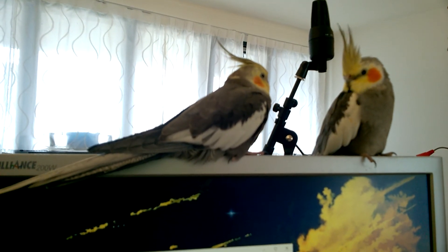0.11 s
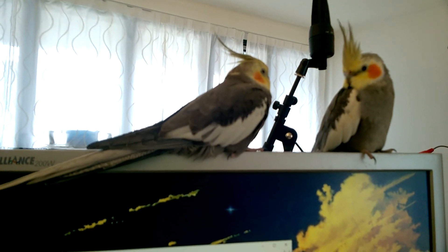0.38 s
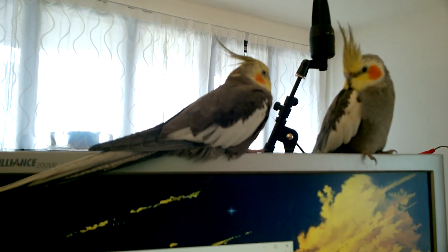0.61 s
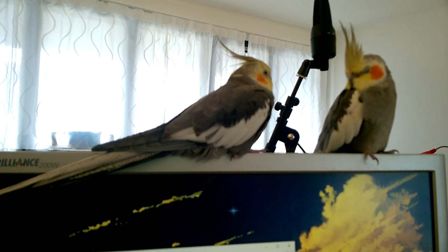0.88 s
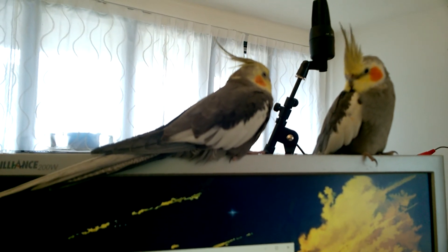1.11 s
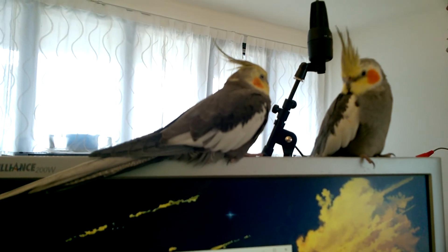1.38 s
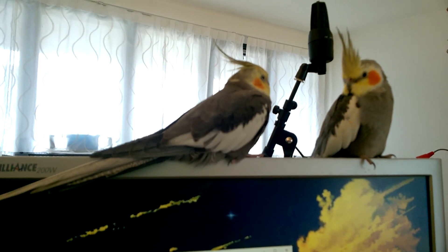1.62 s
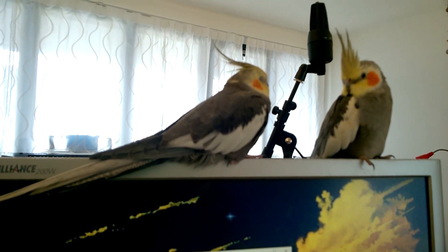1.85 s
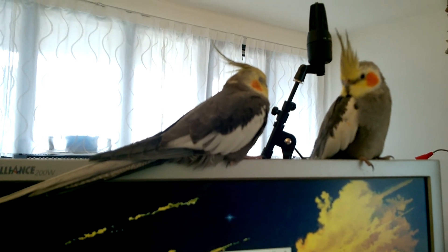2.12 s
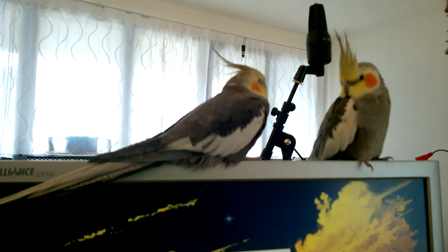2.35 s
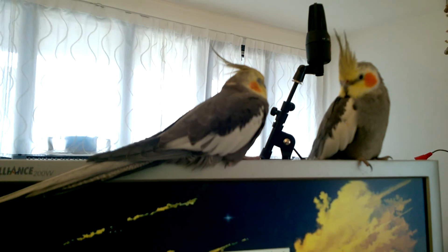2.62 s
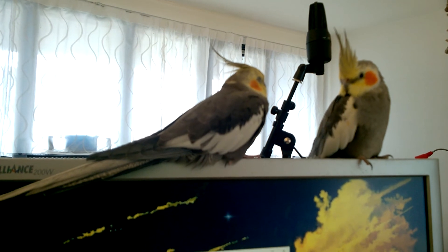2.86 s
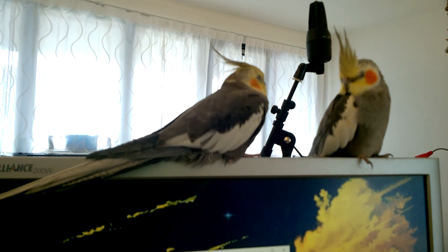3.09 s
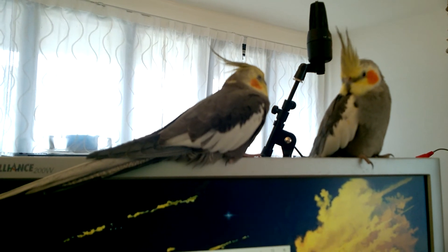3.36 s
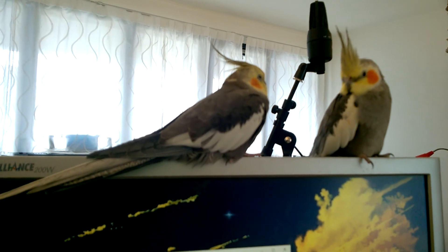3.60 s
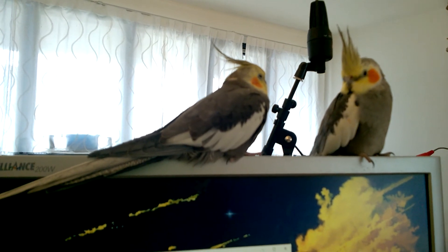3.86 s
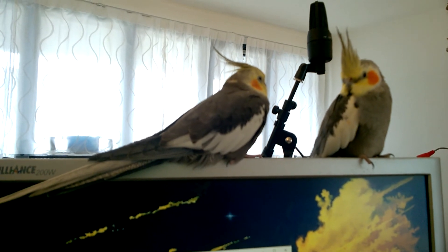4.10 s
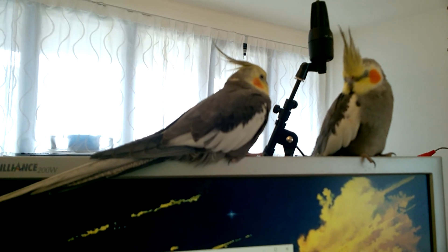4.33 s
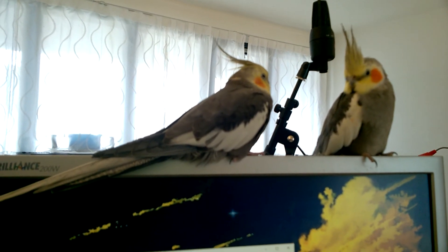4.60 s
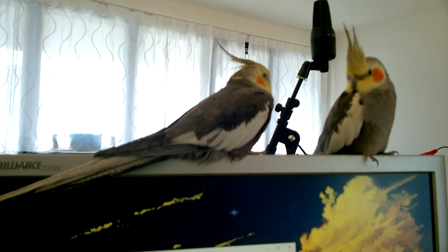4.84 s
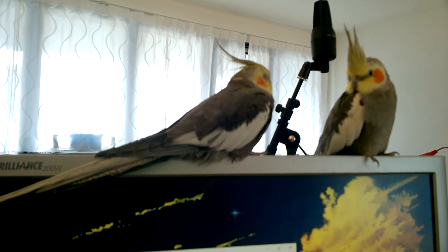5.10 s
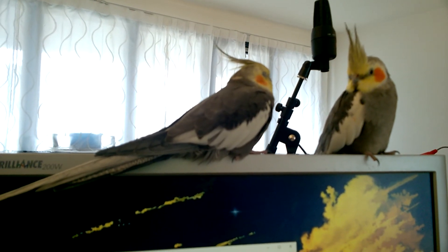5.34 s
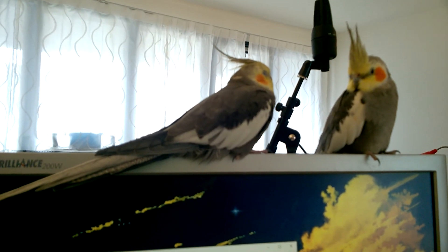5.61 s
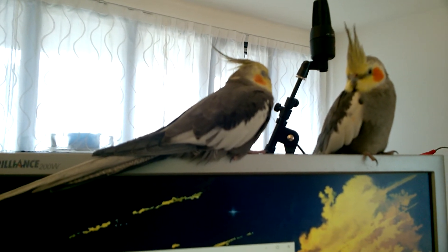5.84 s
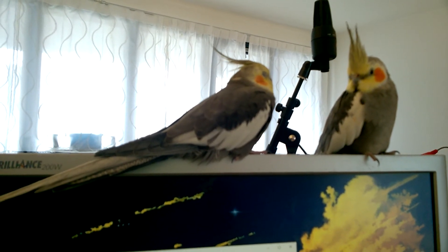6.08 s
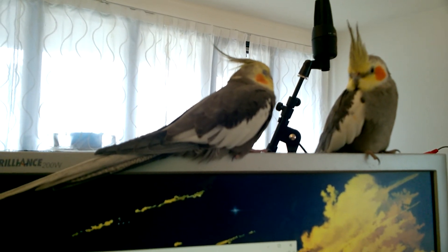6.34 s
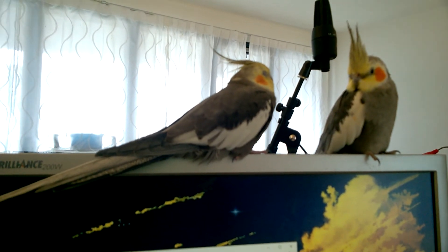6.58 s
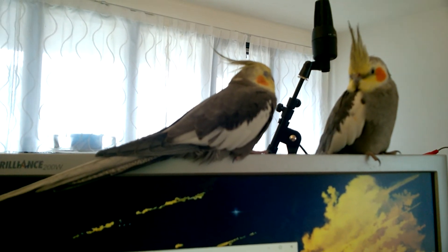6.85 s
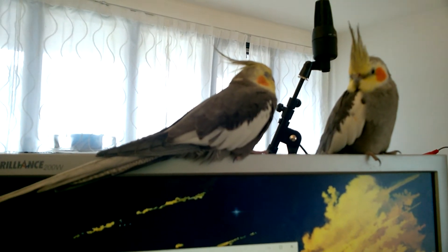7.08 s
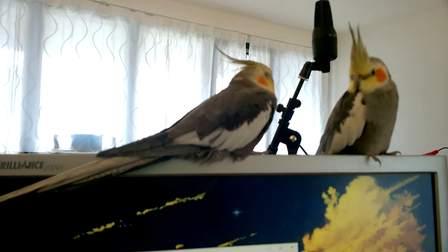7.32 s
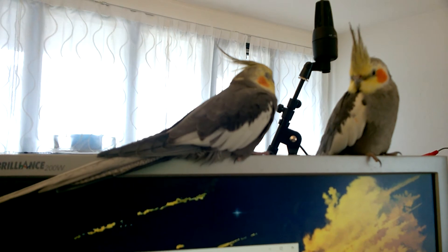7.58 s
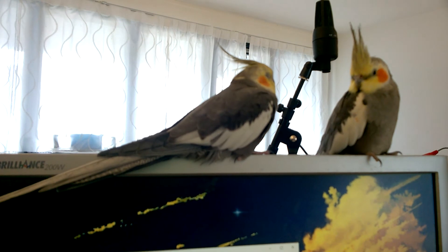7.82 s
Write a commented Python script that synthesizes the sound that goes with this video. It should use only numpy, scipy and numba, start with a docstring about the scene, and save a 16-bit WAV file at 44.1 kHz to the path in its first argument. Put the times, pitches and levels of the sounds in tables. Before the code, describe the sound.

A cockatiel gives five short raspy barks, a long nasal note breaking into a creak, one sharp whistle, then quickening bright chirps in a quiet room.

```python
"""Cockatiel in a quiet room

A cockatiel calls near a small microphone: five raspy barks, a long nasal note that breaks into a rasp and
a creak, one sharp whistle that ends in a short rasp, then a quickening run of ever brighter chirps.
Its voice membranes slap unevenly (a rasp) or steadily (a stack of pitched lines), and the windpipe and beak
colour the sound. Shaped noise makes the room's echoes, the hiss, a low rumble and a faint hum."""
import sys
import numpy as np
from scipy import signal
from scipy.fft import rfft, irfft
from scipy.io import wavfile
from scipy.ndimage import uniform_filter1d
from numba import njit

SR = 44100
rng = np.random.default_rng(int(sys.argv[2]) if len(sys.argv) > 2 else 0)


def attenuation_scalar(level_db):
    """Turn a level in dB into a linear amplitude multiplier (20 dB per decade)."""
    decades = np.asarray(level_db, float) / 20
    return 10 ** decades


def persist_wave(psi):
    """Save psi, clipped to +-1, as 16-bit WAV."""
    counts = np.round(np.clip(psi, -1, 1) * 32767).astype(np.int16)
    wavfile.write(sys.argv[1], SR, np.atleast_2d(counts).T)


N = 350706  # samples
T = np.arange(N) / SR  # seconds

# Steady notes, a short one and a long one, each a list of points along its course.
# Each row: time in seconds, pitch in Hz, level in dB, odd lines in dB next to the even ones,
# level of the half-pitch lines in dB, brightness in dB per octave.
STEADY_NOTES = [
    [(1.368, 628, -47, -17, -71, 1), (1.384, 687.5, -47, 7, -80, 3), (1.402, 705.7, -39.5, 0, -47, 2),
     (1.436, 728, -41, 0, -72, 0)],
    [(2.176, 646, -47, -20, -87, 3), (2.194, 688, -41.5, -1.5, -65, 1), (2.24, 722.3, -37, 0, -82, 0),
     (2.28, 748, -40, 6, -72, -3), (2.31, 732, -39.5, 0, -74, -1), (2.342, 728, -36, 2.5, -71, -3),
     (2.36, 740, -39, -1, -61, -2), (2.396, 742, -41, 5, -58, 2), (2.416, 750.3, -37, 1.5, -76, 0),
     (2.49, 732.8, -38, -5.5, -80, 2), (2.52, 727.5, -33.5, -1, -90, -.7), (2.564, 737, -37, 2, -77, .7),
     (2.582, 742, -53, 13, -61, 0)],
]
CREAK_START_S = 2.75
# throat settings shared by the barks, the break and the creak
BARK_ROUGH, BARK_TOP_DB = .18, -9
BARK_PIPE = (1478, 60, -2)  # windpipe resonance: Hz, width in Hz, ring in dB
# the creak's beak drive, and the treble drive of creak and catches, in dB next to the windpipe's
BURST_BEAK_DB, BURST_TREBLE_DB = -15, -40


@njit
def svf(x, hz, width):
    """State-variable band-pass, gain 1 at a centre that may move."""
    y, b, l = np.empty(len(x)), 0., 0.
    for i in range(len(x)):
        g, k = np.tan(np.pi * hz[i] / SR), width[i] / hz[i]
        v = (b + g * (x[i] - l)) / (1 + g * (g + k))
        b, l, y[i] = 2 * v - b, l + 2 * g * v, k * v
    return y


def band(x, hz, width):
    """A steep resonance (twice through), scaled to about equal power whatever its width."""
    hz, width = hz + np.zeros(N), width + np.zeros(N)
    # the tiny offset keeps the filter from slowing down in silence
    once = svf(x + 1e-18, hz, width)
    return svf(once, hz, width) * np.sqrt(SR / width)


def ring(x, hz, width, db, body):
    """A resonance that stands on a broad passband."""
    peak = svf(x * attenuation_scalar(db) + 1e-18, hz, width + np.zeros(N))
    return band(x + peak * np.sqrt(body[1] / width), *body)


def unit(x):
    """Scale to rms 1."""
    return x / np.sqrt(np.mean(x ** 2))


def gate(s, db):
    """Gain along points of time and dB, shut outside them with short edges."""
    edge = np.clip(np.minimum(T - s[0], s[-1] - T) / 0.00093, 0, 1)
    return attenuation_scalar(np.interp(T, s, db)) * edge


def walk(rate):
    """Smooth random wandering of spread 1; a higher rate per second wanders faster."""
    k = int(SR / rate)
    return unit(uniform_filter1d(uniform_filter1d(rng.standard_normal(N), k), k))


def push(s, length, db, attack, onset_db, sag_db, release, end_db):
    """One breath: attack, sagging hold, then a release given as a share of the length."""
    release_start = length * (1 - np.clip(release, .05, .45))
    times = s + np.array([0, min(attack, length / 2), release_start, length])
    return gate(times, db + np.array([onset_db, 0, sag_db, end_db]))


def share(beak_db, treble_db):
    """Gains of the windpipe, beak and treble drive, the windpipe's being 1."""
    return attenuation_scalar(np.array([[0], [beak_db], [treble_db]]))


# The next functions return the breath drive of the three bands. Those that also set the throat return rows:
# start in seconds, basic slaps per second, roughness, windpipe Hz, width in Hz and ring in dB,
# beak Hz, width in Hz and ring in dB, top band in dB.

def barks():
    """Each bark is one breath; a stronger one makes the membranes slap faster."""
    # Each row: start in seconds, length in seconds, level in dB, treble in dB next to that,
    # attack in seconds.
    bark_rows = [(0.287, .066, -51, -26, .022), (0.668, .088, -52, -28, .026), (1.031, 0.13, -47, -14, .04),
                 (1.42, 0.063, -43, -8, 0.018), (1.712, 0.14, -43, -7.5, .03)]
    onset_db, sag_db, release, end_db = -13, -1, .2, -10
    beak_drive_db, beak = -12, (2950, 220, -3)  # beak: Hz, width in Hz, ring in dB
    treble_steepness = 0.54  # extra treble dB per dB of effort within a bark
    effort, throat = np.zeros((3, N)), []
    for s, length, db, treble_db, attack in bark_rows:
        breath = push(s, length, 0, attack, onset_db, sag_db, release, end_db)
        shapes = [breath, breath, breath ** (1 + treble_steepness)]
        effort += attenuation_scalar(db) * share(beak_drive_db, treble_db) * shapes
        slaps_per_s = 480 + 22 * (db + 46)
        throat.append((s, slaps_per_s, BARK_ROUGH, *BARK_PIPE, *beak, BARK_TOP_DB))
    return effort, throat


def breaking_note():
    """One breath with uneven slaps, the rasp into which the long note breaks."""
    start_s, beak = 2.572, (2920, 200, 0)  # beak: Hz, width in Hz, ring in dB
    breath = push(start_s, .19, -42, attack=.012, onset_db=-12, sag_db=-4, release=.42, end_db=-16)
    throat = [(start_s, 560, BARK_ROUGH, *BARK_PIPE, *beak, BARK_TOP_DB)]
    return share(-8, -36) * breath, throat


def bursts(rows, beak_db):
    """Short bursts of drive that swell quickly and die away."""
    swell_s, crest_db = .0017, 17  # the crest is taken off the listed peak levels
    effort = np.zeros((3, N))
    for s, peak_db in rows:
        age = np.clip(T - s, 0, None) / swell_s
        pulse = age * np.exp(1 - age)
        effort += share(beak_db, BURST_TREBLE_DB) * attenuation_scalar(peak_db - crest_db) * pulse
    return effort


def creak():
    """A string of bursts over a flickering bed of drive, with very fast slaps."""
    # Each row: time of a burst in seconds, peak in dB before the crest is taken off.
    creak_rows = [(2.7531, -33), (2.7721, -35), (2.7944, -37), (2.816, -36), (2.8224, -37), (2.8449, -38),
                  (2.8659, -38), (2.8734, -38), (2.8908, -35), (2.8984, -38), (2.9178, -41), (2.9422, -40),
                  (2.9637, -41), (2.9756, -39), (3.0031, -38), (3.0104, -38), (3.0204, -39), (3.0455, -40),
                  (3.0534, -38), (3.0679, -36), (3.0874, -37), (3.0964, -36), (3.1124, -35), (3.1274, -37),
                  (3.1462, -35), (3.1627, -35), (3.1852, -38), (3.2011, -39), (3.2291, -32), (3.2364, -36)]
    end_s, bed_db, flicker_db = 3.262, -72, 6
    pipe, beak = (1520, 220, -1), (3150, 500, -2)  # Hz, width in Hz, ring in dB
    bed = gate([CREAK_START_S, end_s], [bed_db] * 2) * attenuation_scalar(flicker_db * walk(130))
    effort = bursts(creak_rows, BURST_BEAK_DB) + share(BURST_BEAK_DB, BURST_TREBLE_DB) * bed
    return effort, [(CREAK_START_S, 1300, .15, *pipe, *beak, BARK_TOP_DB)]


def whistle_end_and_chirps():
    """A wider beak shortens the tract, quickens the slaps and brightens the sound."""
    # First row: the short rasp that ends the whistle; the others: chirps.
    # Each row: start in seconds, length in seconds, level in dB,
    # beak opening as beak band in dB next to the windpipe, attack in seconds.
    breath_rows = [(3.427, 0.015, -62, 11, 0.0028), (5.232, .054, -57.5, -5, 0.025),
                   (5.467, 0.053, -51.5, -6.5, 0.027), (5.677, 0.035, -59, 3, .003),
                   (5.876, 0.029, -55.5, -2, 0.0025), (6.028, .042, -50.5, 0.5, .021),
                   (6.207, 0.028, -51, -0.5, 0.0026), (6.377, 0.026, -53.5, 3, 0.0025),
                   (6.519, 0.026, -55, 9, .004), (6.665, 0.026, -53, 17, 0.0099),
                   (6.831, .025, -54, 12.5, 0.0064), (7.004, 0.027, -54, 14, .008)]
    onset_db, sag_db, release, end_db = -10.5, -2, 0.21, -2.5
    rough, pipe_width_hz, beak_width_hz, beak_ring_db, top_db = .3, 300, 600, 0, -2
    effort, throat = np.zeros((3, N)), []
    for s, length, db, opening, attack in breath_rows:
        louder = db + 54  # dB above a middling breath
        treble_db = -6.5 + .85 * opening + .6 * louder
        breath = push(s, length, db, attack, onset_db, sag_db, release, end_db)
        effort += share(opening, treble_db) * breath
        slaps_per_s = 570 + 28 * opening + 15 * louder
        pipe = (1720 + 16 * opening, pipe_width_hz, -2 + .25 * opening)
        beak = (3900 + 26 * opening, beak_width_hz, beak_ring_db)
        throat.append((s, slaps_per_s, rough, *pipe, *beak, top_db))
    return effort, throat


def catches():
    """Bursts in the long note, where the membranes lose their beat."""
    # Each row: time of a burst in seconds, peak in dB before the crest is taken off.
    catch_rows = [(2.2069, -35), (2.255, -37), (2.264, -36), (2.273, -34), (2.283, -35), (2.291, -32),
                  (2.302, -32), (2.33, -38), (2.352, -38)]
    return bursts(catch_rows, -3)


def note_rasp():
    """A little rasp that runs under each steady note."""
    effort = np.zeros((3, N))
    for s, *_ in map(np.transpose, STEADY_NOTES):
        effort += share(-2, -7) * gate(s[[0, -1]], [-64.5] * 2)
    return effort


def efforts():
    """Total drive of the three bands, and the throat settings, each held until the next row's start."""
    calls = [barks(), breaking_note(), creak(), whistle_end_and_chirps()]
    effort = sum(drive for drive, _ in calls) + catches() + note_rasp()
    throat = np.array(sorted(row for _, rows in calls for row in rows), float)
    current = np.maximum(np.searchsorted(throat[:, 0], T) - 1, 0)
    return effort, throat[current, 1:].T.copy()


@njit
def slaps(rate, rough, scatter_db, chance):
    """A click at each wrap of the phase; roughness scatters the length and strength of every period."""
    out, p, k = np.zeros(len(rate) + 1), 0., 0
    for i in range(len(rate)):
        step = rate[i] * np.exp(rough[i] * chance[k, 0]) / SR
        p += step
        if p >= 1:
            p, k = p - 1, k + 1
            size = 10 ** (rough[i] * scatter_db * chance[k, 1] / 20)
            # split the click over two samples so that it falls between them
            out[i] += size * p / step
            out[i + 1] += size * (1 - p / step)
    return out[:-1]


def rasp():
    """Uneven slaps and breathy air ring the windpipe, the beak cavity and the treble."""
    # Side resonances of the half-closed throat, heard until the creak begins.
    # Each row: centre in Hz, width in Hz, level in dB.
    closed_throat = [(1060, 240, -7), (2000, 240, -9), (3600, 380, -14), (5130, 400, -17)]
    # broad passbands of the throat: centre in Hz, width in Hz
    pipe_body, beak_body, treble_band, top_band = (1356, 2430), (3825, 3300), (5700, 2700), (8970, 3200)
    scatter_db, puff_share, puff_s, air_share = 5, 4.5, .0013, 0.34
    effort, throat = efforts()
    rate, rough, pipe_hz, pipe_width, pipe_db, beak_hz, beak_width, beak_db, top_db = throat
    clicks = slaps(rate, rough, scatter_db, rng.standard_normal((N // 10, 2))) / np.sqrt(rate)
    # a puff of turbulent air escapes after every slap, more in a rough voice
    puff_swell = signal.lfilter([1], [1, -np.exp(-1 / (puff_s * SR))], clicks)
    puffs = puff_swell * rng.standard_normal((3, N))
    air = rough * puff_share * unit(puffs) + air_share * rng.standard_normal((3, N))
    pipe, beak, treble = effort * (unit(clicks) + air) / np.hypot(1, rough * puff_share)
    # neighbouring resonances swing in opposite phase
    low = ring(pipe, pipe_hz, pipe_width, pipe_db, pipe_body)
    low -= ring(beak, beak_hz, beak_width, beak_db, beak_body)
    closed = pipe * (T < CREAK_START_S)
    for k, (hz, width, db) in enumerate(closed_throat):
        low -= (-1) ** k * attenuation_scalar(db) * band(closed, hz, width)
    low = signal.sosfilt(signal.butter(4, (552, 5440), "bandpass", fs=SR, output="sos"), low)
    return low + band(treble, *treble_band) - band(treble * attenuation_scalar(top_db), *top_band)


def notes():
    """Steady slaps give a stack of lines; strong-weak slaps bring in the odd and the half-pitch lines."""
    # Each row: multiple of the pitch, level in dB.
    line_levels = [(1, -15), (2, 3.5), (3, -5), (4, -1.5), (5, -10), (6, -18), (7, -10), (8, -17), (9, -25),
                   (10, -40), (11, -35.5), (12, -29), (13, -41), (14, -57), (15, -59), (16, -61)]
    out = np.zeros(N)
    waver = 1 + 0.00413 * walk(90)  # on the pitch
    # every line sways on its own by 1.2 dB
    sway = {k: attenuation_scalar(line_db + 1.2 * walk(20)) for k, line_db in line_levels}
    for s, hz, db, odd_db, half_db, bright_db in map(np.transpose, STEADY_NOTES):
        phase = 2 * np.pi * np.cumsum(np.interp(T, s, hz) * waver) / SR
        half = gate(s, half_db)
        for k in sway:
            octaves = np.log2(max(k / 2, 1))
            swell = gate(s, db + k % 2 * odd_db + bright_db * octaves)
            # the throat delays each line differently, which blunts the pulse
            delay = k * k / 2
            out += sway[k] * swell * np.cos(k * phase - delay)
            out += np.sqrt(sway[k]) * half * np.cos((k + .5) * phase - delay)
    return np.sqrt(2) * out


def whistle():
    """A near-sine that dips and leaps, with a strong second line and faint third and fourth ones."""
    # Each row: time in seconds, pitch in Hz, level in dB, level of the second line in dB.
    whistle_points = [(3.405, 2350, -72, -90), (3.412, 2616, -56, -76), (3.414, 2730, -34, -48),
                      (3.418, 2410, -35, -38), (3.421, 2122, -32.5, -28.5), (3.428, 2346, -29.5, -29),
                      (3.431, 2050, -31, -23), (3.432, 2530, -31, -33), (3.435, 3183, -32.5, -58),
                      (3.441, 2720, -39, -53)]
    s, hz, db, second_db = np.transpose(whistle_points)
    phase = 2 * np.pi * np.cumsum(np.interp(T, s, hz)) / SR
    higher = attenuation_scalar(-33) * (np.sin(3 * phase) + np.sin(4 * phase))
    main = gate(s, db) * (np.sin(phase) + higher)
    second = gate(s, second_db) * np.sin(2 * phase)
    return np.sqrt(2) * (main + second)


def tick():
    """A faint beak tick: a single click through a broad resonance."""
    start_s, hz, width_hz = 3.36, 5000, 5000
    click = 1. * (np.arange(N) == int(start_s * SR))
    return attenuation_scalar(-59) * band(click, hz, width_hz)


def room(x):
    """Dense echoes that die away, the treble sooner."""
    t60_s, treble_t60_s, first_wall_s = 0.37, 0.2, 0.0067  # T60: time to fall by 60 dB
    t = T[:SR]
    noise = rng.standard_normal(SR)
    low = signal.sosfilt(signal.butter(1, 5000, fs=SR, output="sos"), noise)
    tail = low * 1000 ** (-t / t60_s) + (noise - low) * 1000 ** (-t / treble_t60_s)
    tail *= t > first_wall_s
    return attenuation_scalar(-8.5) * signal.fftconvolve(x, tail / np.sqrt(np.sum(tail ** 2)))[:N]


def quiet():
    """Noise filtered into microphone hiss, a wavering low rumble of the house and a faint hum."""
    # Shape of the hiss. Each row: frequency in Hz, relative level in dB.
    hiss_shape = [(41, -32), (70, -10), (151, -6.5), (237, -6), (265, -11), (325, -5), (751, -12),
                  (803, -9), (1580, -15), (1730, -16), (15500, -23.5)]
    hz, db = np.transpose(hiss_shape)
    f = np.maximum(np.arange(N // 2 + 1) * SR / N, 1)
    spectrum = rfft(rng.standard_normal(N)) * attenuation_scalar(np.interp(np.log(f), np.log(hz), db))
    hiss = irfft(spectrum, N)
    rumble_hz, rumble_width_hz = 43.2, 34.4
    rumble = band(rng.standard_normal(N), rumble_hz, rumble_width_hz)
    rumble = band(rumble, rumble_hz, rumble_width_hz) * attenuation_scalar(1.6 * walk(7.8))
    hum = band(rng.standard_normal(N), 238.8, 3.2)
    return attenuation_scalar(-66) * unit(hiss) + attenuation_scalar(-68) * unit(rumble) + attenuation_scalar(-81) * unit(hum)


def scene():
    """The bird, its echoes and the quiet room; the whistle is aimed away and excites the room more."""
    call, sharp = rasp() + notes() + tick(), whistle()
    heard = call + sharp + room(call + attenuation_scalar(4) * sharp)
    top = signal.butter(6, 9600, fs=SR, output="sos")  # dulls the bird and echoes above 9600 Hz
    return (signal.sosfilt(top, heard) + quiet())[None]


def roll_off(x):
    """The treble ends steeply here."""
    return signal.sosfilt(signal.butter(12, 15900, fs=SR, output="sos"), x)


def record(dry):
    """Turn the finished mix into the sound that is saved."""
    return roll_off(dry)


dry = scene()
out = record(dry)
persist_wave(out)
```